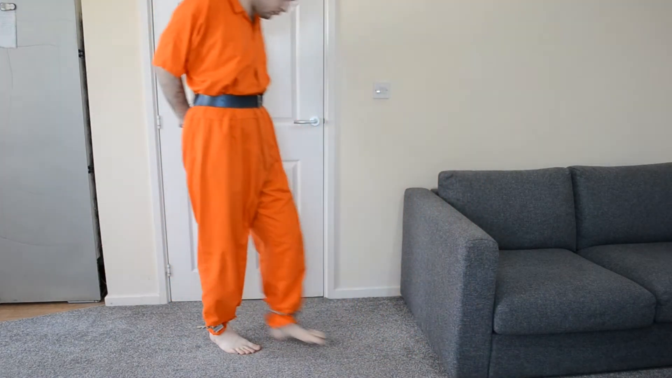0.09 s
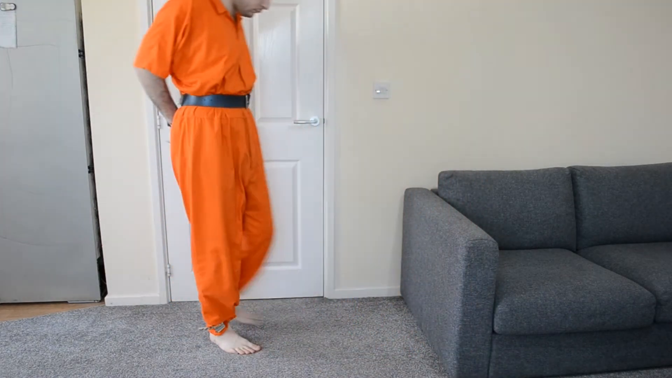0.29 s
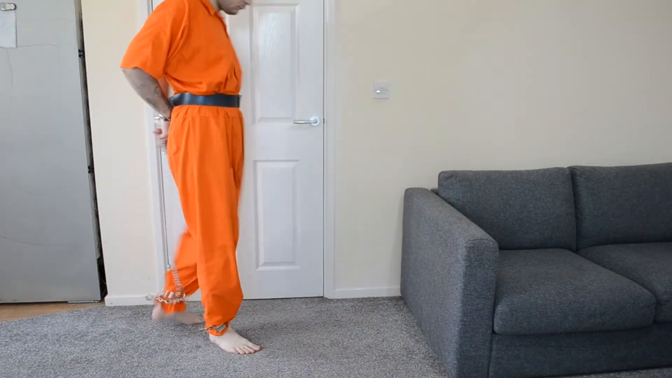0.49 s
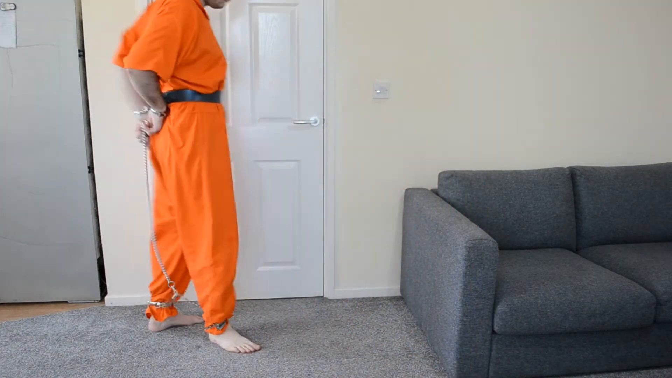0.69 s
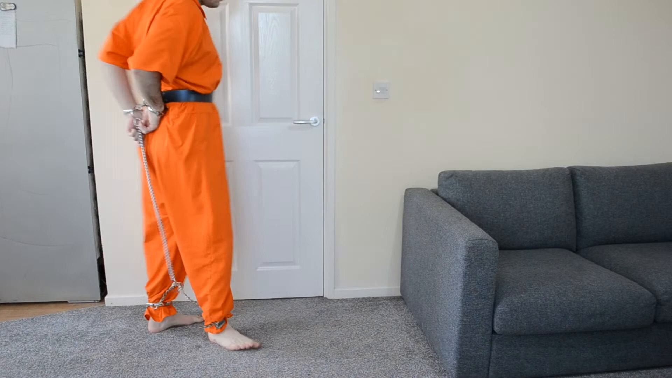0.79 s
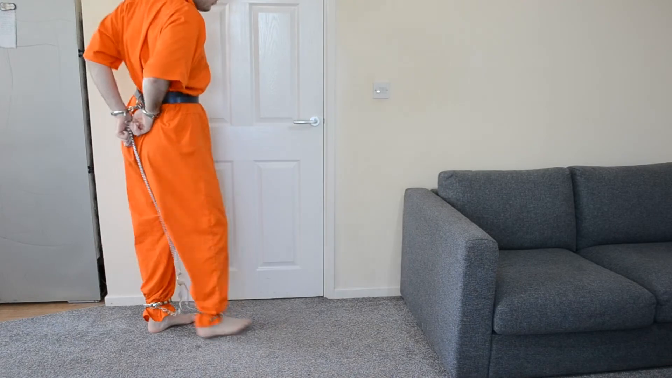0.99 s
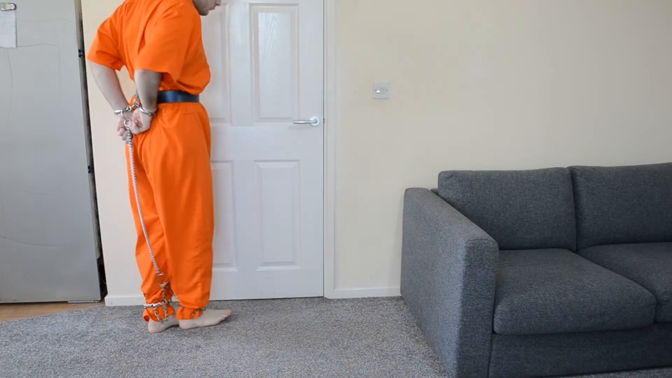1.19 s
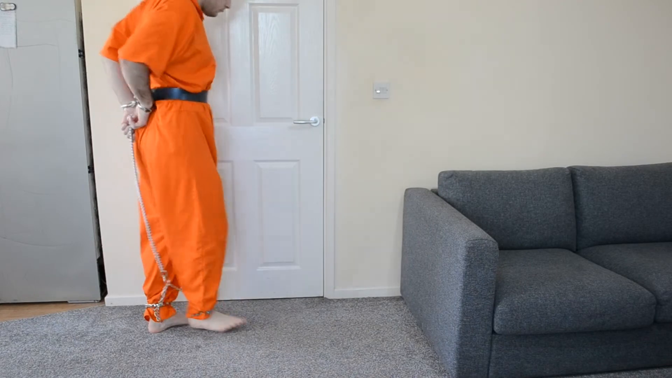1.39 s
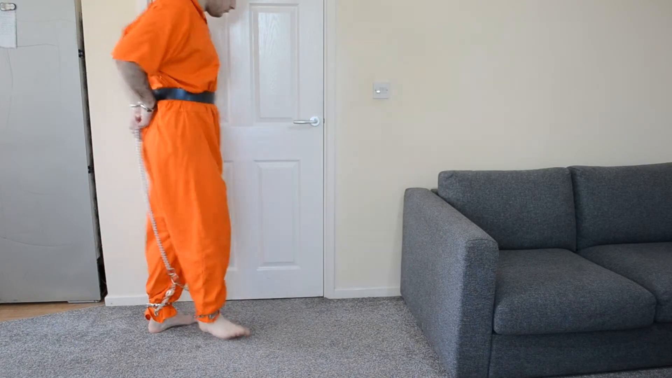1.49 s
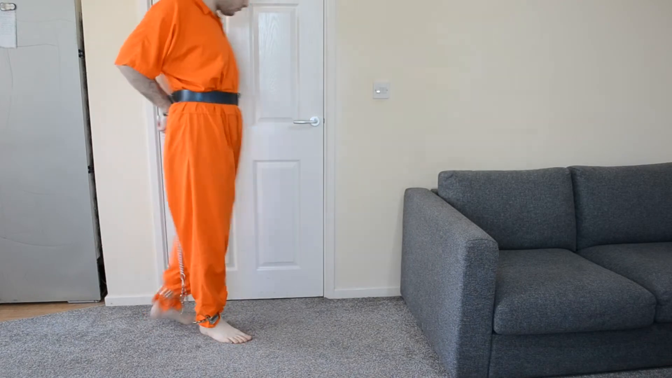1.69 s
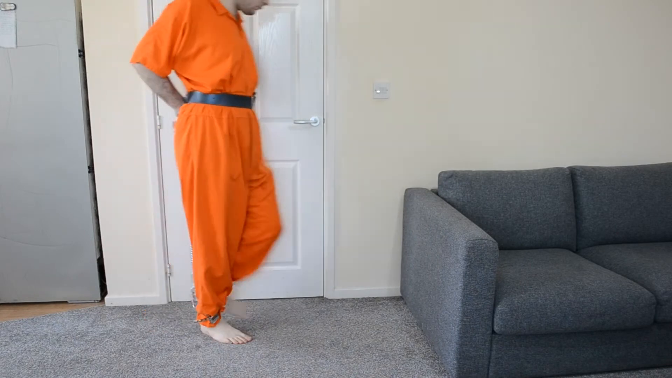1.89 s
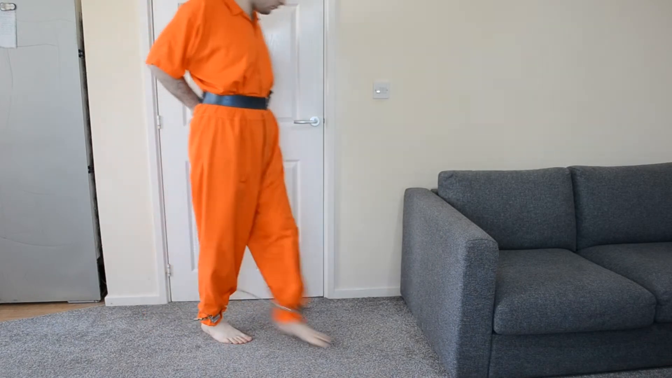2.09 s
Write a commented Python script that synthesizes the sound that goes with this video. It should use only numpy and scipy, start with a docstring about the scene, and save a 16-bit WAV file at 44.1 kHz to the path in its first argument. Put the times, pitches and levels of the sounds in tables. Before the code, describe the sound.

Steel shackles clink and jangle as someone shuffles barefoot over carpet. Small chain links chime brightly and slide while heavier cuffs knock and ping in uneven clusters. Cloth and feet rustle softly underneath, heard nearby in a quiet living room.

```python
"""A carpeted living room, where someone shuffles barefoot in steel shackles.
Small chain links strike and chime near 9.5 kHz, and fizz as they slide over each other.
The heavier cuffs knock, rattle and ping until a touch damps them; cloth and feet rustle underneath.
The room gives every hit a short tail, over a quiet hiss."""
import sys
import numpy as np
from scipy import signal
from scipy.fft import rfft, irfft
from scipy.io import wavfile
from scipy.ndimage import uniform_filter1d

SR = 44100
rng = np.random.default_rng(int(sys.argv[2]) if len(sys.argv) > 2 else 0)


def wav_record(signal):
    """Record a signal, one row per channel, as 16-bit PCM in the file named by sys.argv[1]."""
    frames = np.transpose(np.atleast_2d(signal))
    bounded = np.clip(frames, -1, 1)
    # unit amplitude maps onto the largest positive 16-bit level
    quanta = np.round(bounded * 32767).astype(np.int16)
    wavfile.write(sys.argv[1], SR, quanta)


N = 92610


def gain_of(db):
    return 10 ** (np.asarray(db) / 20)


def unit_rms(x):
    return x / np.sqrt(np.mean(x ** 2) + 1e-20)


def curve_at(points, hz):
    """Read a curve along a log frequency axis."""
    point_hz, value = np.transpose(points)
    return np.interp(np.log(hz + 1), np.log(point_hz + 1), value)


def fader_db(points):
    """A level ride: straight ramps in dB between timed points."""
    return np.interp(np.arange(N) / SR, *np.transpose(points))


def add(mix, start_s, sound):
    part = mix[round(start_s * SR):][:len(sound)]
    part += sound[:len(part)]


def equalised(sound, curve):
    hz = np.fft.rfftfreq(len(sound), 1 / SR)
    return irfft(rfft(sound) * gain_of(curve_at(curve, hz)), len(sound))


def coloured_noise(colour):
    return unit_rms(equalised(rng.standard_normal(N), colour))


def ring(hz, t60_s):
    """One dying mode of the steel, with a quick, soft attack."""
    t = np.arange(0, .25, 1 / SR)
    attack = np.minimum(t / 0.0011, 1)
    return attack * gain_of(-60 * t / max(t60_s, .004)) * np.sin(2 * np.pi * hz * t)


def damped(sound, free_s, share):
    """Rings freely for a moment, then a touch leaves only a share of it."""
    t = np.arange(len(sound)) / SR
    return sound * (share + (1 - share) / (1 + (t / free_s) ** 6))


# Tone of the noise floor: freq_hz, relative_db
HISS_COLOUR = [(15, -46), (25, -16), (238, 1), (680, 1), (2440, -5.5), (2640, 2), (4410, -9.5),
               (6980, -4), (7940, -20.5), (9500, -8), (10300, -6), (11400, -22), (14800, -48),
               (22000, -120)]


def hiss(level_db=-58.5):
    """A quiet, steady bed of noise."""
    return gain_of(level_db) * coloured_noise(HISS_COLOUR)


# Reverb time of the living room: freq_hz, t60_s
ROOM_DECAY = [(300, 0.38), (1500, 0.31), (4000, 0.48), (7000, 0.36), (10000, 0.36)]


def room(send, predelay_s=.008, turn_s=.09):
    """Sparse reflections of random sign, each band dying at its own speed; three tails take turns."""
    out, turn = np.zeros(N), np.arange(N) / SR / turn_s
    for k in range(3):
        reflections = np.zeros(SR // 2)
        slots = np.arange(round(predelay_s * SR), SR // 2 - 12, 12)
        reflections[slots + rng.integers(0, 12, len(slots))] = rng.choice([-1., 1.], len(slots))
        hz, t, bands = signal.stft(reflections, SR, nperseg=128)
        decay = gain_of(-60 * t / curve_at(ROOM_DECAY, hz)[:, None])
        tail = signal.istft(bands * decay, SR, nperseg=128)[1]
        crossfade = np.sqrt(2 / 3) * np.cos(np.pi * (turn + k / 3))
        out += signal.fftconvolve(send * crossfade, tail / np.linalg.norm(tail))[:N]
    return out


# Swells of cloth and feet, plus the low clatter of the shackles crashing at 0.39 s: time_s, level_db
RUSTLE_SWELLS = [(0.0, -46.5), (0.05, -48), (0.2, -60.5), (0.28, -55.5), (0.37, -54.5), (0.39, -43.5),
                 (0.46, -55), (0.6, -61), (0.62, -56), (0.87, -60.5), (1.13, -59.5), (1.22, -46),
                 (1.3, -50), (1.36, -57.5), (1.58, -70), (1.65, -55), (1.77, -71), (1.81, -52.5),
                 (2.04, -65), (2.1, -83)]
# Tone of the rustle: freq_hz, relative_db
RUSTLE_COLOUR = [(88, -69), (150, -19.5), (741, -2), (1120, -2.5), (1540, -0.5), (2620, -4), (3720, -4.5),
                 (8000, -17), (10400, -17), (17600, -120)]


def rustle(grain_db=1):
    """Grainy noise of cloth and feet; its loudest swell is the low clatter of the shackles crashing."""
    grain = unit_rms(uniform_filter1d(rng.standard_normal(N), size=300))
    return coloured_noise(RUSTLE_COLOUR) * gain_of(fader_db(RUSTLE_SWELLS) + grain_db * grain)


# Clear notes from the cuffs: start_s, level_db, pitch_hz, free_ring_s
CUFF_PINGS = [(.2424, -34, 3097, 0.021), (.2665, -43, 1531, 0.024), (.386, -45.5, 1070, 0.0084),
              (.619, -37, 6900, 0.014), (.620, -39, 3780, 0.02), (.621, -38, 5090, 0.011),
              (.643, -38, 3790, 0.016), (1.2851, -23.5, 6910, 0.0061), (1.2851, -29, 7000, 0.0048),
              (1.2855, -30, 10580, 0.019), (1.500, -45.5, 3420, 0.01), (1.632, -51, 4700, 0.03),
              (1.638, -41, 3066, 0.012), (1.797, -38.5, 6790, 0.0081)]


def cuff_pings():
    """Single parts of the cuffs ring clearly until a wrist or ankle touches them."""
    out = np.zeros(N)
    for start_s, level_db, pitch_hz, free_s in CUFF_PINGS:
        ping = damped(ring(pitch_hz, t60_s=0.12), free_s, share=.08)
        add(out, start_s, gain_of(level_db) * ping)
    return out


# Resonances of a steel cuff: pitch_hz, level_db, t60_s
CUFF_MODES = [(1038, 5.5, 0.016), (1578, -4.5, 0.0086), (1880, -5.5, 0.021), (2762, -2, 0.019),
              (3181, 1.5, 0.0099), (3410, 2, 0.012), (3786, 8.5, 0.0078), (4750, 4, 0.012),
              (5120, 6.5, 0.014), (6250, 7, 0.0082), (6852, 9, 0.01), (7260, 6, 0.017), (8970, 5, 0.0092),
              (10580, 0, 0.011)]
# The five EQ points of a knock: freq_hz
KNOCK_BANDS_HZ = [1300, 3400, 5200, 7000, 10000]
# Cuff hits: start_s, level_db, band1_db to band5_db (at the EQ points), rattle_t60_s
CUFF_KNOCKS = [(0.1657, -49, -13, -9.5, -8.5, -15, 8.5, 0.16),
               (0.2344, -36.5, -32, -10, -16, -13.5, -11.5, 0.06),
               (0.2427, -29, -26, -12.5, -8, -18.5, -11, 0.12),
               (0.3286, -34, -17, -14, -17, -12, -13, 0.042),
               (0.3842, -23, -14.5, -6.5, -11.5, -18.5, -8, 0.038),
               (0.389, -22.5, -13.5, -12, -15, -16, -7, 0.15),
               (0.5245, -37.5, -47, -32, -12.5, -13.5, -5, 0.035),
               (0.619, -31.5, -23.5, -9.5, -9.5, -7.5, -10, 0.062),
               (0.6452, -34.5, -15, -38, -16, -17, -2.5, 0.014),
               (0.734, -32, -23, -14.5, -17, -16, -17, 0.11),
               (0.7675, -43.5, -24, -22, -11, -10, -6, 0.094),
               (1.0515, -43.5, -35, -3.5, -14, -11.5, 5, 0.046),
               (1.1048, -40, -17, -16, -14, -15.5, 4, 0.052),
               (1.285, -24.5, -21, -14, -17.5, -9, -12, 0.014),
               (1.2885, -27, -30, -10.5, -10.5, -13.5, -7, 0.064),
               (1.441, -34, -20, -11.5, -17.5, -15, -7, 0.048),
               (1.5415, -42.5, -14, -29, -12, -36, -5, 0.0098),
               (1.629, -30.5, -26.5, -20, -11.5, -15.5, -19, 0.051),
               (1.6376, -35, -23, -18, -6.5, -9.5, -12, 0.059), (1.735, -39, -13, -8.5, -7, -8, -10, 0.056),
               (1.7951, -37.5, -14.5, -11.5, -10.5, -8, -7, 0.076),
               (1.8412, -43, -26, -26, -3, -20, -2.5, 0.024),
               (1.933, -37.5, -45, -32, -22, -19.5, -8.5, 0.021),
               (1.937, -41, -41, -23, -14, -11, -9.5, 0.03),
               (1.977, -32.5, -22.5, -19, -11, -16.5, -13, 0.024),
               (1.9984, -45, -14, -18, -7, -16, -25, 0.017)]


def cuff_knocks(clash_db=12, clash_t60_s=0.034, bounces_per_s=900, rattle_db=-2.5):
    """Each knock is a noisy clash plus the cuff's modes; small bounces strike each mode again."""
    out, t = np.zeros(N), np.arange(0, .1, 1 / SR)
    for start_s, level_db, *bands_db, rattle_t60_s in CUFF_KNOCKS:
        tone = [(550, -39)] + list(zip(KNOCK_BANDS_HZ, bands_db))
        clash = rng.standard_normal(len(t)) * gain_of(clash_db - 60 * t / clash_t60_s)
        knock = equalised(clash, tone)
        rattle_fade = gain_of(rattle_db - 60 * t / rattle_t60_s)
        for hz, mode_db, t60_s in CUFF_MODES:
            bounces = (rng.random(len(t)) < bounces_per_s / SR) * rng.choice([-1, 1], len(t))
            strikes = (t == 0) + bounces * rattle_fade
            detune = 1 + 0.028 * np.cos(np.pi * rng.random())
            mode = damped(ring(hz * detune, t60_s)[:len(t)], free_s=0.006, share=0.08)
            add(knock, 0, gain_of(curve_at(tone, hz) + mode_db) * signal.fftconvolve(strikes, mode))
        add(out, start_s, gain_of(level_db) * knock)
    return out


# Swells of the sliding chain: time_s, level_db
SLIDE_SWELLS = [(0.0, -74), (0.24, -85), (0.381, -43), (0.53, -48.5), (0.6, -56), (0.88, -60),
                (1.03, -62.5), (1.2, -62), (1.3, -53), (1.45, -56.5), (1.81, -62), (1.86, -52), (1.99, -57),
                (2.1, -90)]


def chain_slide(touches_per_s=1500, spread_db=3.5, ring_db=-24):
    """Sliding links make a fizz of tiny contacts, each a click with a brief ring."""
    touches = rng.random(N) < touches_per_s / SR
    strength = gain_of(spread_db * np.minimum(rng.exponential(1, N), 3))
    polarity = rng.choice([-1, 1], N)
    touch = gain_of(ring_db) * ring(hz=9580, t60_s=0.012)
    click = signal.lfilter(*signal.butter(2, [3000, 11000], "band", fs=SR), np.arange(200) == 0)
    add(touch, 0, click)
    fizz = unit_rms(signal.oaconvolve(touches * strength * polarity, touch)[:N])
    return fizz * gain_of(fader_db(SLIDE_SWELLS))


def contact_tick(low_cut_hz=6900):
    """Link meets link: a few milliseconds of bright noise."""
    burst = rng.standard_normal(500) * np.exp(-np.arange(500) / SR / 0.0065)
    return signal.lfilter(*signal.butter(4, low_cut_hz, "high", fs=SR), burst)


# Resonances of one link: pitch_ratio, level_db
LINK_MODES = [(1, -0.5), (1.013, -11), (.978, -14.5), (.355, -20.5)]


def link_chime(pitch_hz, tick_db, t60_s):
    """A cluster of close modes, a faint low mode and the tick; a neighbour link soon damps the ring."""
    detunes = 1 + .004 * rng.standard_normal(len(LINK_MODES))
    detunes[0] = 1  # the main mode stays on pitch
    modes = sum(gain_of(db) * ring(pitch_hz * ratio * detune, t60_s)
                for (ratio, db), detune in zip(LINK_MODES, detunes))
    chime = damped(modes, free_s=0.015, share=0.12)
    add(chime, 0, gain_of(tick_db) * contact_tick())
    return chime


# Link hits: start_s, level_db, pitch_hz, tick_db (relative to the ring), t60_s
LINK_STRIKES = [(0.1272, -49, 9630, -10, 0.066), (0.1663, -47, 9180, -16, 0.068),
                (0.384, -30.5, 9640, -14, 0.075), (0.396, -30, 9580, -16, 0.13),
                (0.4109, -27, 9650, -21, 0.12), (0.4294, -27, 9490, -10, 0.19),
                (0.4601, -24, 9520, -5, 0.055), (0.4645, -27, 9640, -12, 0.05),
                (0.584, -33, 9550, -21, 0.058), (0.604, -31, 9620, -17, 0.25), (0.6449, -23, 9490, -9, 0.1),
                (0.6594, -40, 9500, -25, 0.067), (0.7218, -28, 9540, -8, 0.043),
                (0.8353, -40.5, 9760, -2, 0.05), (0.8949, -29, 9520, -8, 0.078),
                (0.9395, -43, 9650, -8, 0.051), (1.0489, -29.5, 9620, -14, 0.064),
                (1.0544, -31, 9610, -23, 0.06), (1.1045, -31.5, 9360, -13, 0.07),
                (1.1129, -34.5, 9520, -33, 0.078), (1.1455, -38, 9520, -12, 0.11),
                (1.1756, -24.5, 9670, -8.5, 0.035), (1.224, -32, 9560, -3, 0.045),
                (1.228, -33, 9700, -5, 0.051), (1.393, -39.5, 9570, -17, 0.073),
                (1.442, -29, 9590, -20, 0.046), (1.447, -29, 9540, -2.5, 0.043),
                (1.4716, -34.5, 9560, -20, 0.11), (1.491, -32, 9460, -17, 0.054),
                (1.5, -31, 9740, -7, 0.085), (1.5923, -29, 9550, -10, 0.074),
                (1.7152, -38.5, 9680, -3, 0.06), (1.8, -39.5, 9930, 5, 0.058)]


def chain_strikes():
    """Small links strike each other in bright, separate chimes."""
    out = np.zeros(N)
    for start_s, level_db, pitch_hz, tick_db, t60_s in LINK_STRIKES:
        add(out, start_s, gain_of(level_db) * link_chime(pitch_hz, tick_db, t60_s))
    return out


def scene():
    """Chain, knocks and pings get a low cut and a send to the room; rustle and hiss stay dry."""
    low_cut = signal.butter(4, 400, "high", fs=SR, output="sos")
    steel = [chain_strikes() + chain_slide(), cuff_knocks(), cuff_pings()]
    chain, knocks, pings = signal.sosfilt(low_cut, steel)
    # the thin links excite the room less than the knocking cuffs
    send = gain_of(-3.5) * chain + knocks + gain_of(-9) * pings
    reverb = gain_of(-2) * room(send)
    return (chain + knocks + pings + reverb + rustle() + hiss())[None]


# Microphone response: freq_hz, gain_db
MIC_RESPONSE = [(25, -5), (7300, -3.5), (8000, -8.5), (8800, -3), (10300, -6.5), (11500, -25)]


def record(dry, high_cut_hz=11600):
    """The microphone dips near 8 kHz and fades at the top, ahead of a steep high cut."""
    hz = np.linspace(0, SR / 2, 513)
    mic = signal.firwin2(255, hz, gain_of(curve_at(MIC_RESPONSE, hz)), fs=SR)
    high_cut = signal.firwin(511, high_cut_hz, window=("kaiser", 9), fs=SR)
    return signal.oaconvolve(dry, np.convolve(mic, high_cut)[None], "same")


dry = scene()
out = record(dry)
wav_record(out)
```